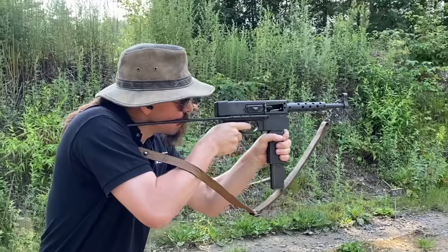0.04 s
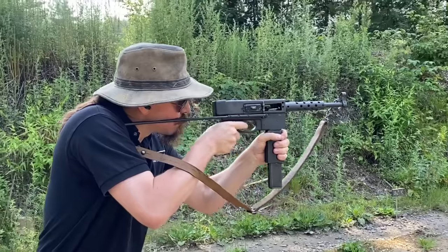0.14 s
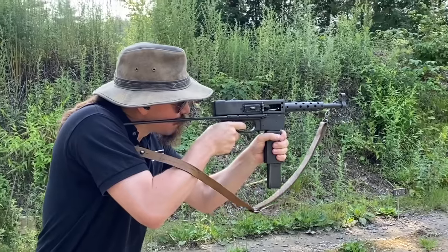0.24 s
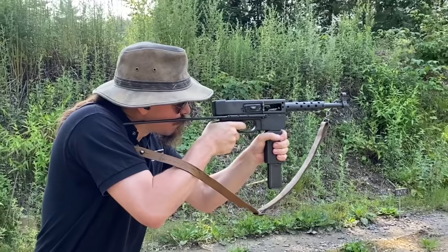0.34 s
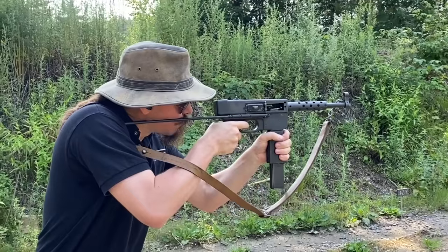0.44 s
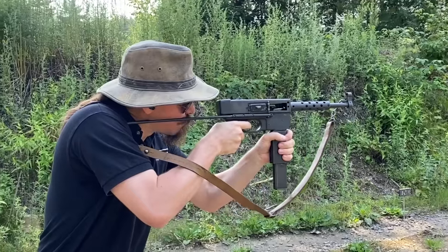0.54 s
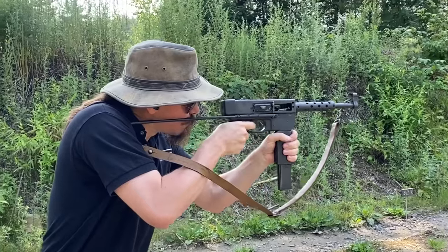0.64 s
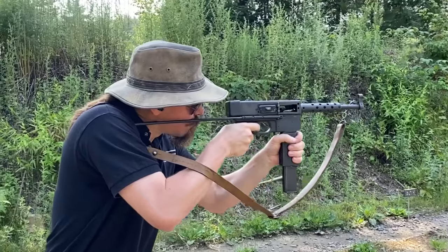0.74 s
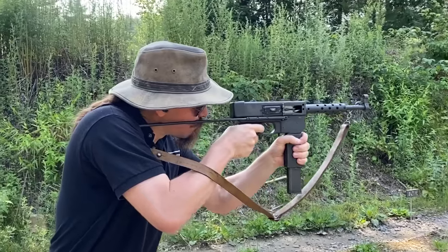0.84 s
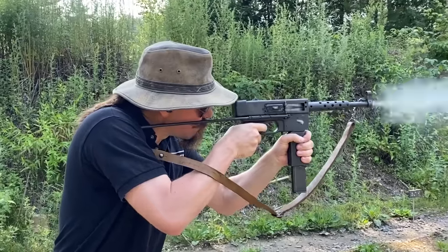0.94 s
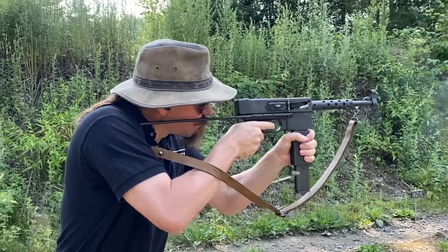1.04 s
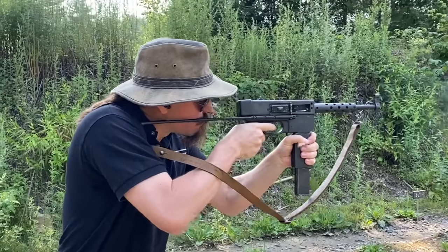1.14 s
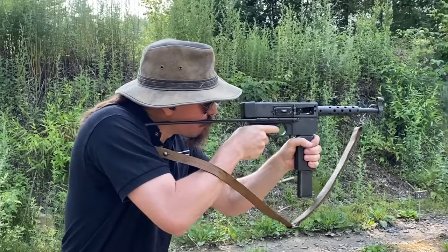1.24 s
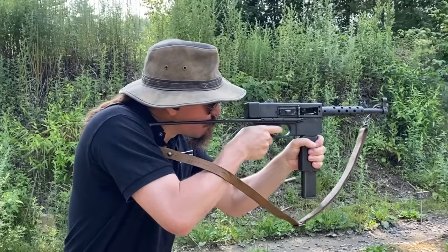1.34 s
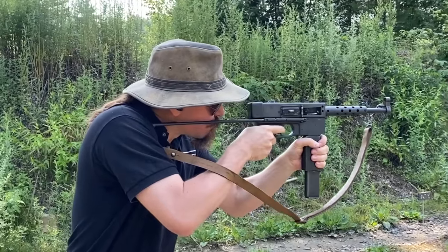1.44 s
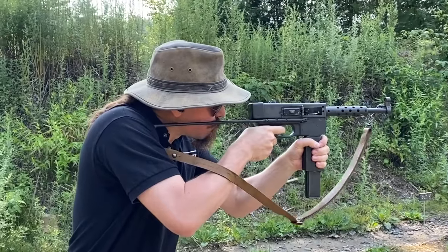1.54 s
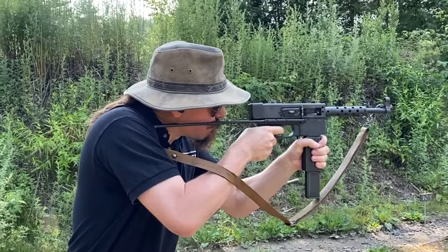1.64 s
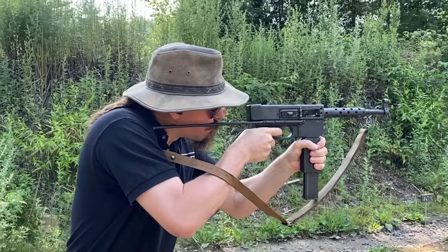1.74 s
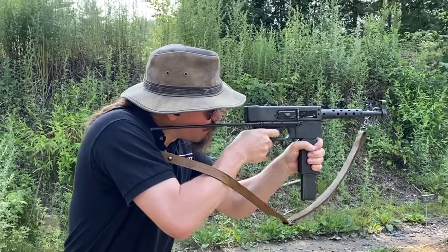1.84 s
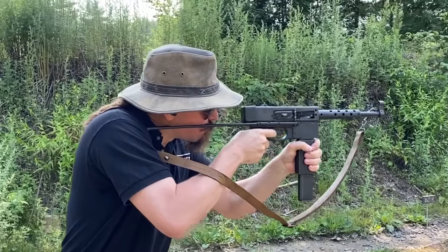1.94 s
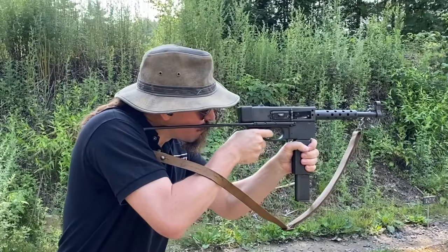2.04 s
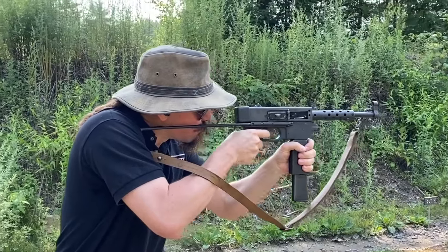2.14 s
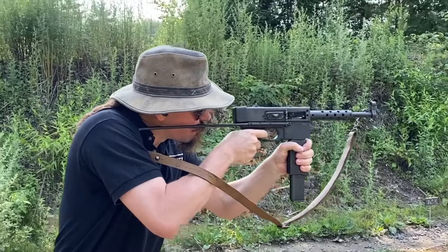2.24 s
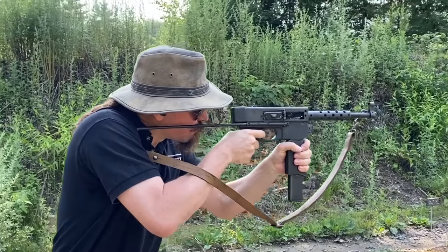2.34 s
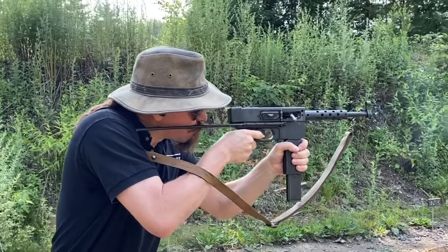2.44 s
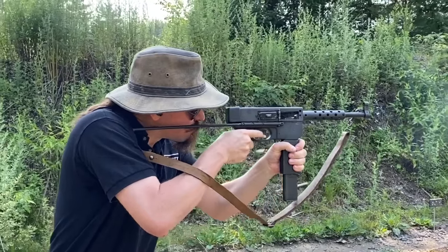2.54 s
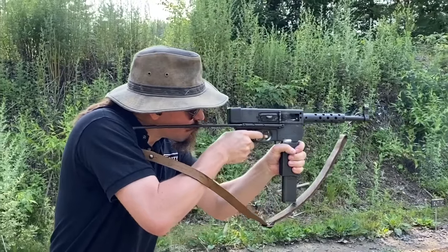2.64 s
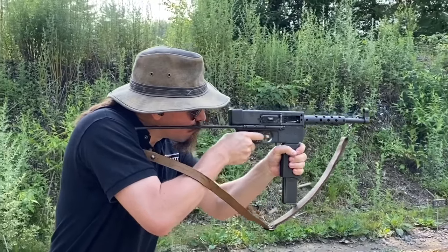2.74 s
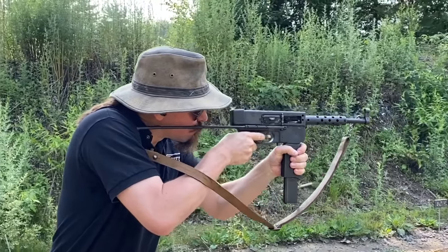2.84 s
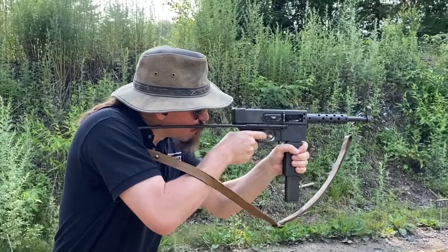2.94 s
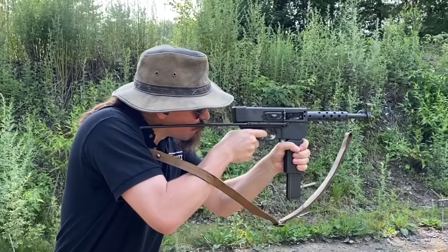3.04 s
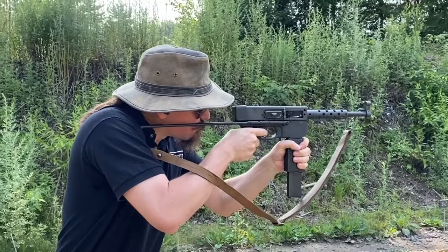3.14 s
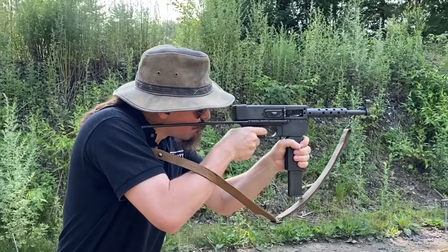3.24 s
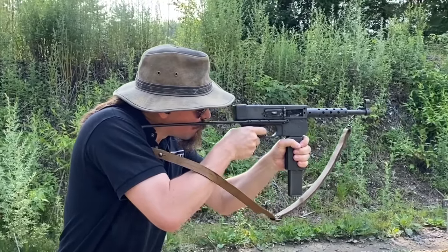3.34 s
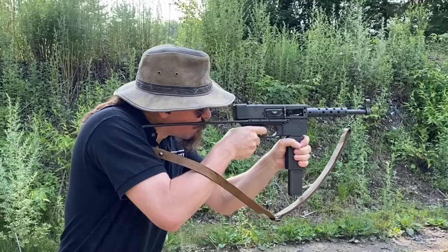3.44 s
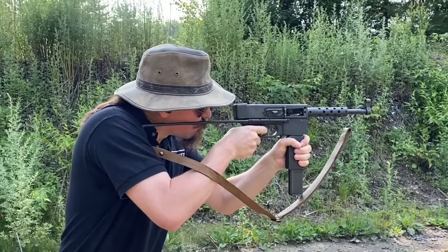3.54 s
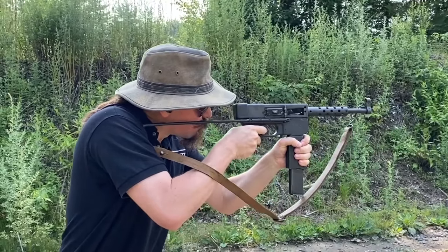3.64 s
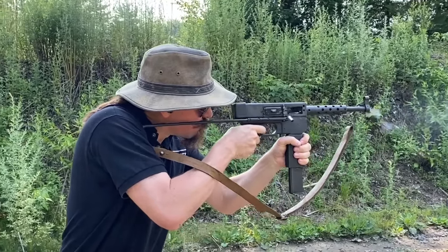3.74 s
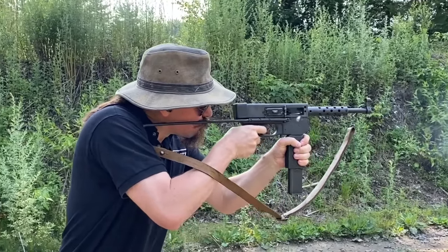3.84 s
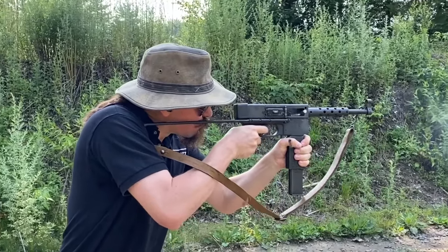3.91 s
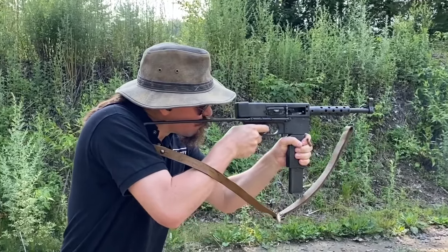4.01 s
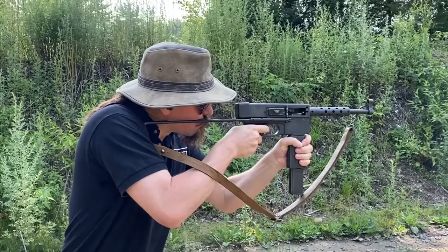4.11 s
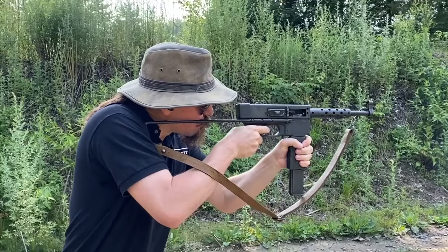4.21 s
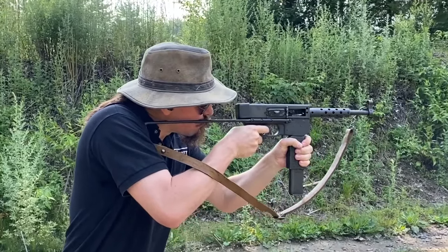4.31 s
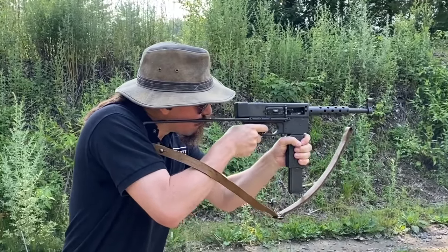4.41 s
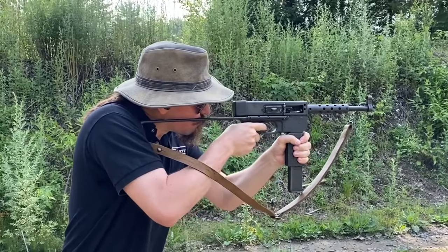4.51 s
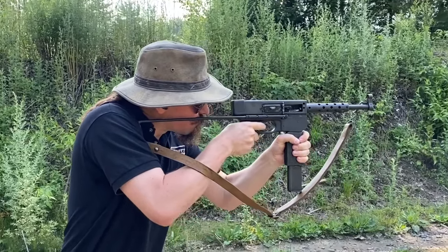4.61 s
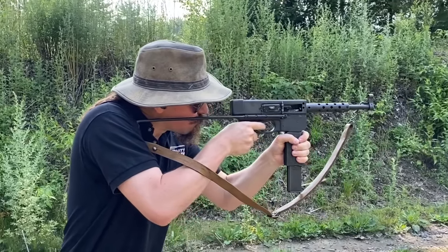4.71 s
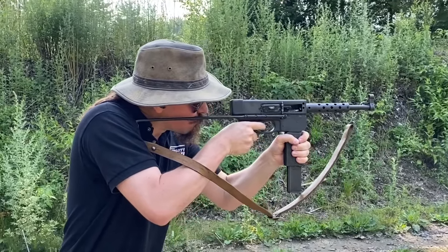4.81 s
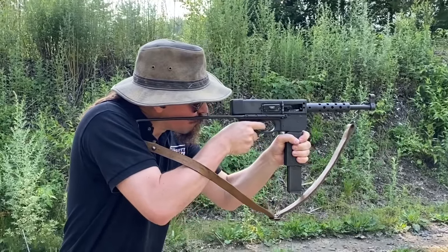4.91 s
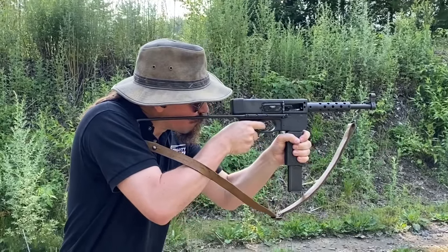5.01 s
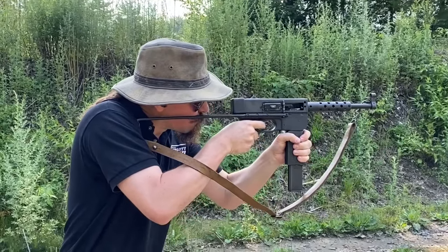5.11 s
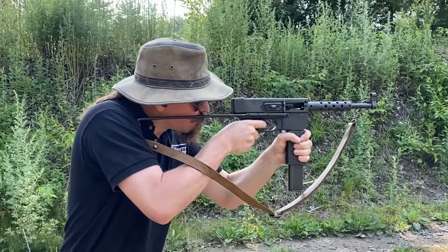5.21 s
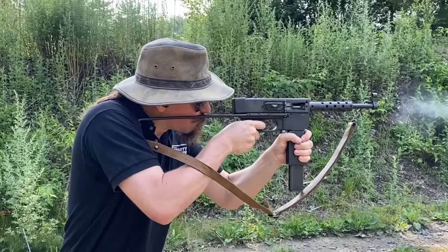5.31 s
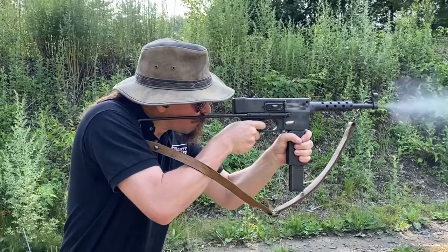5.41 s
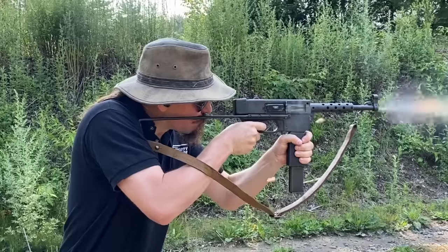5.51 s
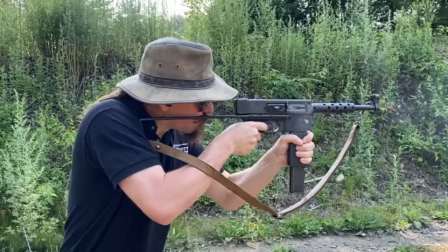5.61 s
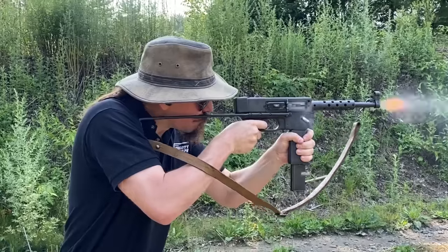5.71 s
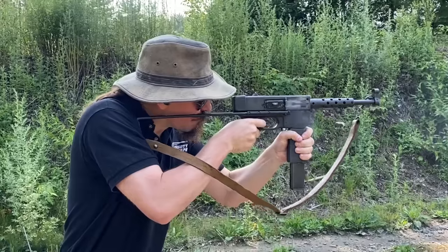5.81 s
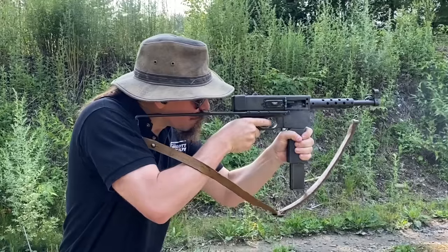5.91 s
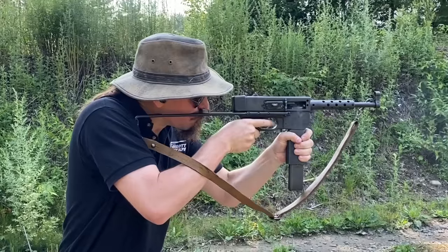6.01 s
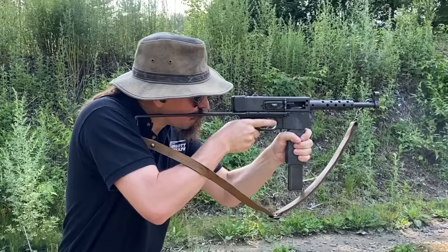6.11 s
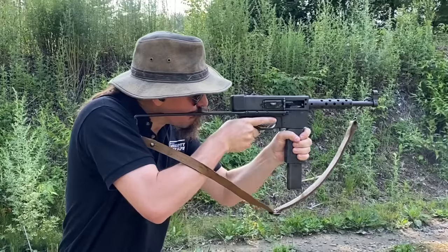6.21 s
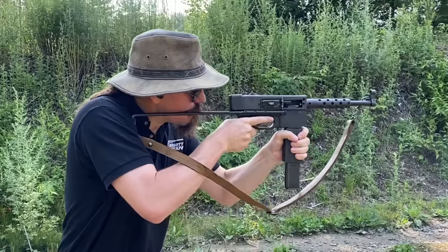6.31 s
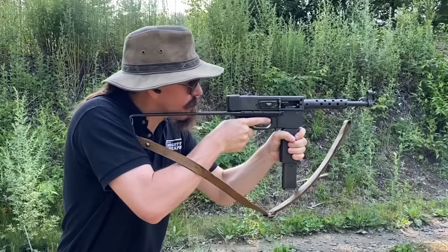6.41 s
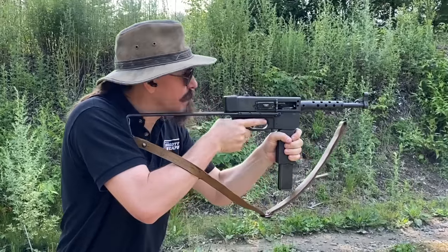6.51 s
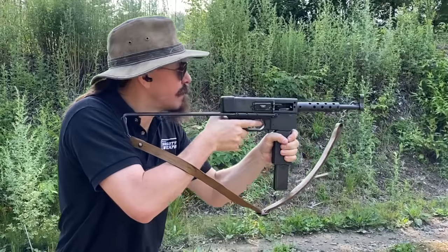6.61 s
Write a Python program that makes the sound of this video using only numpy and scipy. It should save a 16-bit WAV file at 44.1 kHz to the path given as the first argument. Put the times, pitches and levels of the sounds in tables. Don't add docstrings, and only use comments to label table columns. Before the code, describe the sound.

Dry steel clicks and sling rustle give way to a loud pair of shots, another pair, three shots, then a longer run of six. Each blast is a ragged crack with a low thump and clattering action. Dull claps and hissing echoes return across the open range, fading into quiet hush with faint chirps and tiny brass rings. Two close microphone ports catch slight wind.

```python
import sys
import numpy as np
from scipy import signal
from scipy.fft import rfft, irfft, next_fast_len
from scipy.io import wavfile
from scipy.ndimage import uniform_filter1d

SR = 44100
rng = np.random.default_rng(int(sys.argv[2]) if len(sys.argv) > 2 else 0)


def log_audio(samples):
    frames = np.atleast_2d(samples).T
    limited = np.clip(frames, -1, 1)
    pcm = np.round(limited * 32767).astype(np.int16)
    wavfile.write(sys.argv[1], SR, pcm)


def gain_from_db(level_db):
    decades = np.asarray(level_db, float) / 20
    return 10 ** decades


N = 293706


def evened(x):
    return x / np.sqrt(np.mean(x ** 2) + 1e-20)


def read(points, hz):
    f, value = np.transpose(points)
    return np.interp(np.log(hz + 1), np.log(f + 1), value)


def follow(points, t):
    return np.interp(t, *np.transpose(points))


def ragged(size, smooth, spread_db):
    return gain_from_db(spread_db * evened(uniform_filter1d(rng.standard_normal(size), smooth)))


def add(mix, s, sound):
    part = mix[:, round(s * SR):][:, :sound.shape[-1]]
    part += sound[..., :part.shape[1]]


def hiss(size, colour, apart):
    hz = np.fft.rfftfreq(size, 1 / SR)
    both, own = rfft(rng.standard_normal(size)), rfft(rng.standard_normal((2, size)))
    spectrum = both + apart * own * (hz < 8000)
    return evened(irfft(spectrum * gain_from_db(read(colour, hz)), size))


def field_grid():
    return np.arange(N // 128 + 5) * 128 / SR, np.fft.rfftfreq(512, 1 / SR)[:, None]


# (frequency [Hz], left-right likeness [-1..1])
PORT_LIKENESS = [(100, 0.86), (300, 0.93), (500, -0.63), (1500, -0.41), (2100, 0.85), (2600, 0.34),
                 (7000, 0.22), (8300, 0.6)]


def field(level_db):
    a, b, c, d, patches = rng.standard_normal((level_db.shape[1], 257, 5)).T
    patches = evened(uniform_filter1d(uniform_filter1d(patches, 5, 0), 12, 1))
    same = np.clip(read(PORT_LIKENESS, field_grid()[1][:, 0]), -1, 1)[:, None]
    left = a + 1j * b
    right = same * left + np.sqrt(1 - same ** 2) * (c + 1j * d)
    z = np.array([left, right])
    z[:, :2] = 0
    return signal.istft(z * gain_from_db(level_db + 1.5 * patches), nperseg=512, noverlap=384)[1][:, :N]


# (frequency [Hz], level [dB per Hz])
FLOOR_COLOUR = [(18, -40.5), (30, -6), (71, 10), (165, -13), (355, -1), (822, -3), (1110, -17), (2000, -5),
                (5790, -42.5), (8000, -58), (9500, -82), (22000, -120)]


def floor():
    t, hz = field_grid()
    return gain_from_db(-59) * evened(field(read(FLOOR_COLOUR, hz) + 0 * t))


# (frequency [Hz], level [dB per Hz])
WIND_TONE = [(20, -28.5), (45, -8), (75, 4), (120, -9), (200, -19), (400, -43), (1000, -95.5)]


def breeze():
    return gain_from_db(-62.5) * hiss(N, WIND_TONE, .3)


# (time [s], level [dB])
GUSTS = [(0.0, -41.5), (0.07, -39), (0.136, -39.5), (0.206, -48), (0.228, -40), (0.422, -38), (0.432, -40),
         (0.82, -44)]


def wind(t):
    return gain_from_db(follow(GUSTS, t)) * hiss(len(t), WIND_TONE, 0.26)


# (frequency [Hz], level [dB per Hz])
LEAF_COLOUR = [(1500, -13), (3000, 1.5), (7000, -5), (14500, -12.5), (16300, -44.5)]


def leaves(t):
    return gain_from_db(-65.5) * hiss(len(t), LEAF_COLOUR, .8)


# (time [s], frequency [Hz])
INSECT_PITCH = [(0, 3900), (.2, 4250), (.35, 4400), (.75, 4600)]


def insect(t):
    level_db, fade_db_per_s = -65.5, -13.5
    phase = 2 * np.pi * np.cumsum(follow(INSECT_PITCH, t)) / SR
    return gain_from_db(level_db + fade_db_per_s * t) * ragged(len(t), 900, 3) * np.sin(phase)


# (time [s], level [dB])
RUSTLE_LEVEL = [(0.0, -56), (0.208, -61), (0.408, -46), (0.454, -49.5), (0.57, -63), (0.618, -72.5),
                (0.81, -64.5)]
# (frequency [Hz], level [dB per Hz])
CLOTH_COLOUR = [(200, -8), (600, -4), (2000, -7.5), (4000, -13.5), (8000, -17.5), (15300, -29.5),
                (16400, -52.5)]


def rustle(t):
    ticks_per_s, ticks_db, tick_decay_s = 330, 0.5, 0.00095
    ticks = (rng.random(len(t)) < ticks_per_s / SR) * rng.exponential(1, len(t))
    grains = signal.oaconvolve(ticks, np.exp(-t[:600] / tick_decay_s))[:len(t)]
    level = gain_from_db(follow(RUSTLE_LEVEL, t) - 1.0)
    return (1 + gain_from_db(ticks_db) * grains) * level * hiss(len(t), CLOTH_COLOUR, 0.56)


def before():
    t = np.arange(0, BOLT_RUNS[0][1], 1 / SR)
    ducked = np.minimum((t[-1] - t) / .04, 1)
    return (wind(t) + rustle(t) + leaves(t) + insect(t)) * ducked


# (time [s], level [dB])
BIRD_CALLS = [
    (2.022, -68),
    (2.107, -69),
    (2.194, -66),
    (2.279, -69),
    (3.4, -64.5),
    (3.487, -62.5),
    (3.577, -64),
]


def bird(db):
    t = np.arange(3300) / SR
    chirp_s = .022
    hz = 5900 + 2200 * np.exp(-t / 0.0063)
    arch = (t < chirp_s) * abs(np.sin(np.pi * t / chirp_s)) ** .5
    fall = np.sin(2 * np.pi * np.cumsum(hz) / SR) * arch
    buzz = hiss(len(t), [(4000, -33.0), (4500, -9.5), (5250, -4), (5600, -2), (6100, -35.5)], 0.55)
    return gain_from_db(db - 3.5) * fall + gain_from_db(db - 2.0) * buzz * np.exp(-((t - .055) / 0.011) ** 2)


def since_blast(t):
    fired = np.array([-9] + [row[0] for row in BLASTS])
    return t - fired[np.searchsorted(fired, t, "right") - 1]


# (frequency [Hz], level [dB per Hz])
RUMBLE_COLOUR = [(20, -27.5), (40, -2), (60, -1.5), (110, -5.5), (200, -8.5), (300, -34.5), (1000, -91)]
# (delay [s], spread [s], level [dB])
LATE_RETURN = (.3, 0.051, 9.7)


def rumble():
    delay = since_blast(np.arange(N) / SR)
    late_s, spread_s, late_db = LATE_RETURN
    level_db = -40.5 - 40.5 * delay
    level_db += late_db * np.exp(-((delay - late_s) / spread_s) ** 2)
    return uniform_filter1d(gain_from_db(level_db), size=400) * hiss(N, RUMBLE_COLOUR, .6)


# (delay [s], level [dB])
ECHO_LEVEL = [(0, -42), (.08, -38), (.17, -33), (.3, -34), (.42, -36.5), (.6, -45), (.85, -54.5),
              (1.1, -61), (1.45, -68.5)]
BURST_TRIM = [-0.11, -0.49, 0.83, -1.32]
# (frequency [Hz], level [dB])
ECHO_COLOUR = [(170, -26.5), (300, -1), (500, 9), (1200, 4), (2300, 3), (7000, -2.5), (15300, -3.5),
               (16400, -48.5)]
# (frequency [Hz], slope [dB per s of travel])
AIR_LOSS = [(300, 4.5), (1000, 8), (2700, -3.4), (6300, -12.5), (10000, -30.5), (15000, -52)]
# (delay [s], spread [s], frequency [Hz], width [octaves], level [dB])
BANK_RETURNS = [
    (.21, 0.013, 2500, 0.52, 8),
    (.33, 0.035, 487, 0.28, 6.5),
    (.42, .015, 700, 1.1, 5),
]


def roll():
    t, hz = field_grid()
    delay = since_blast(t)
    burst = np.searchsorted([row[0] for row in BOLT_RUNS[1:]], t)
    level = np.interp(delay, *np.transpose(ECHO_LEVEL), right=-150) + np.take(BURST_TRIM, burst)
    level = level + read(ECHO_COLOUR, hz) + read(AIR_LOSS, hz) * np.minimum(delay, 2)
    for s, spread, bank_hz, octaves, db in BANK_RETURNS:
        in_time = ((delay - s) / spread) ** 2
        in_pitch = (np.log2((hz + 1) / bank_hz) / octaves) ** 2
        level = level + db * np.exp(-in_time - in_pitch)
    return field(level - 14.5)


# (time [s], peak [dB], frequency [Hz])
FAR_SLAPS = [
    (1.141, -24, 362),
    (1.281, -21, 450),
    (1.364, -19, 582),
    (2.919, -23.5, 580),
    (4.301, -21.5, 590),
    (6.144, -24, 457),
    (6.249, -25.5, 566),
]


def slap(db, hz):
    t = np.arange(900) / SR
    swell = t / 0.002 * np.exp(1 - t / 0.0033)
    return gain_from_db(db) * np.sin(2 * np.pi * hz * t) * swell * np.array([[1], [-.3]])


# (time [s], tick peak [dB], ring [dB])
CASE_LANDINGS = [
    (1.5743, -28, -65),
    (3.1004, -40, -76),
    (4.447, -29, -59.5),
    (6.3857, -34.5, -67),
]


def case(tick_db, ring_db):
    t = np.arange(15000) / SR
    thin = [(2000, -12), (5000, -4.5), (11000, -3), (14000, 1.5), (15600, -3), (16400, -35.5)]
    tick = hiss(len(t), thin, 0.25) * gain_from_db(tick_db - 5 - 60 * t / 0.013)
    beat = 1 + 0.5 * np.sin(2 * np.pi * 23 * t)
    return tick + gain_from_db(ring_db - 60 * t / 0.93) * np.sin(2 * np.pi * 10950 * t) * beat


# (time [s], peak [dB], ring [Hz])
GUN_CLICKS = [(.813, -28, 2010), (.0692, -53, 2220), (.0798, -32, 2250), (.1895, -32.5, 2320),
              (.201, -28, 2430), (.263, -33.5, 2190), (.2966, -15.5, 2480), (.3511, -30.5, 2180),
              (.3567, -24.5, 2254), (.383, -17, 2450), (.443, -18.5, 2254), (.4747, -17, 2590),
              (.5334, -29.5, 2160), (.5661, -20, 2372), (2.443, -20.5, 1980), (3.7155, -13, 4340)]
# (frequency [Hz], level [dB], t60 [s])
LOOSE_STEEL = [(950, -8, .04), (1250, -10, .04), (1750, -9, .045), (2300, 0, .035), (2520, -3, .04),
               (4100, -6, .025)]


def click(db, hz):
    t = np.arange(6000) / SR
    snap = hiss(len(t), [(300, -30), (hz * 0.5, -9), (hz, 0), (hz * 1.5, -6), (9000, -12),
                         (15500, -22), (16400, -50)], 0.1)
    snap = snap * gain_from_db(-60 * t / 0.053) / (1 + (t / 0.011) ** 6)
    tail = hiss(len(t), [(300, -29), (900, -0.5), (2200, 2.5), (4000, -10.0), (9000, -29.0)], 0.77)
    rings = 0
    for f, ring_db, t60 in LOOSE_STEEL:
        level = gain_from_db(ring_db + 4 * rng.standard_normal() - 60 * t / t60)
        rings = rings + level * np.sin(2 * np.pi * f * rng.uniform(0.9, 1.03) * t)
    return gain_from_db(db - 9.5) * (snap + gain_from_db(-4.5) * rings + gain_from_db(-12.5 - 60 * t / .22) * tail)


# (start [s], slam [s], start level [dB], slam level [dB], hollow knock [dB])
BOLT_RUNS = [
    (0.82, 0.869, -14, -16, -7),
    (2.376, 2.413, -30, -27, -12.5),
    (3.648, 3.689, -34.5, -24, -15.5),
    (5.276, 5.309, -36.5, -18.5, -19.5),
]
# (frequency [Hz], level [dB per Hz])
SCRAPE_COLOUR = [(180, -60.5), (300, -29), (1090, -25.5), (1480, -4), (1650, -13), (2520, -6),
                 (3760, -14.5), (4310, -13), (8000, -14.5), (10400, -13.5), (17600, -120)]


def bolt(start, slam, start_db, slam_db, knock_db):
    t = np.arange(start - slam, .004, 1 / SR)
    chatter = ragged(len(t), 60, 3.3)
    scrape = hiss(len(t), SCRAPE_COLOUR + [(15000, -14), (16400, -58)], 0.79) * chatter
    knock = hiss(len(t), [(400, -21.5), (750, -7), (950, 4.5), (1250, -16), (2200, -16.0)], 1.0)
    level_db = np.interp(t, [t[0], 0], [start_db, slam_db])
    swell = gain_from_db(knock_db) * np.exp(np.minimum(t, 0) / 0.0068)
    thud_hz, thud_s, lead_s = 276, 0.0042, 0.0056
    thud = np.sin(2 * np.pi * thud_hz * t) * np.exp(-((t + lead_s) / thud_s) ** 2)
    sound = gain_from_db(level_db) * scrape + swell * knock + gain_from_db(knock_db + 0.5) * thud
    return sound * signal.windows.tukey(len(t), .08)


def sweep(top_hz, tau, ring):
    t = np.arange(5000) / SR
    ports_apart = .015 * np.array([[1], [-1]])
    slide_s = tau * (rng.uniform(0.914, 1.062) + ports_apart)
    ground_hz = 40.7 + 44.4 * np.exp(-t / 0.027)
    hz = ground_hz + top_hz * np.exp(-t / slide_s)
    fade = 0.8 * np.exp(-(t / ring) ** 1.9) + 0.22 * np.exp(-t / .04)
    return hz, np.sin(2 * np.pi * np.cumsum(hz, 1) / SR) * fade * np.minimum(t / 0.0025, 1)


# (frequency [Hz], level [dB per Hz])
ACTION_COLOUR = [(700, -26.5), (1500, -7.5), (2600, 0), (4200, -8.5), (9000, -8), (16300, -23)]
# (delay [s], level [dB re crack])
ACTION_CYCLE = [
    (.022, -20.5),
    (.036, -20.5),
    (.075, -26.5),
]


def action(t):
    jitter = .003 * rng.standard_normal((len(ACTION_CYCLE), 2))
    knocks = 0
    for s, db in np.add(ACTION_CYCLE, jitter):
        level = gain_from_db(db + 2.3 * rng.standard_normal())
        knocks = knocks + level * np.exp(-abs(t - s) / np.where(t > s, .011, .002))
    return hiss(len(t), ACTION_COLOUR, 1.0) * knocks


# (time [s], crack peak [dB], thump [dB], ground slap delay [s], slap [dB])
BLASTS = [(.865, -15, -11, .044, -20), (0.952, -11.5, -8, 0.036, -30), (2.409, -6, -11.5, .035, -6.5),
          (2.499, -5.5, -3.5, .04, -27.5), (3.685, -6, -16, .03, -9), (3.773, -5.5, -7.5, .039, -9.5),
          (3.881, -5.5, -6.5, .036, -21), (5.312, -5.5, -5, .033, -10.5), (5.42, -6, -2.5, .047, -25),
          (5.524, -6.5, -12.5, .039, -9.5), (5.625, -7, -4, .04, -43), (5.724, -8.5, -12.5, .036, -7),
          (5.829, -5.5, -10.5, 0.032, -12.5)]
# (frequency [Hz], level [dB per Hz])
CRACK_COLOUR = [(300, 0.5), (700, -9.5), (1500, -5.5), (3000, -9), (6000, -14), (10000, -9), (15500, -18),
                (16500, -45)]
# (frequency [Hz], level [dB per Hz])
GAS_COLOUR = [(120, -28), (280, 2), (500, 0.5), (900, -8.5), (1600, -12), (3000, -40)]


def shot(crack_db, thump_db, delay, slap_db):
    t = np.arange(9000) / SR
    gate = np.minimum(t / 0.00016, 1) / (1 + (t / 0.011) ** 6)
    spits = gate * ragged(len(t), 30, 4.9) * np.exp(-t / 0.024)
    scatter = gain_from_db(-6.5) * np.exp(-t / 0.044)
    sound = gain_from_db(crack_db - 8.5) * hiss(len(t), CRACK_COLOUR, 1.0) * (spits + scatter)
    puff = np.minimum(t / 0.011, 1) / (1 + (t / 0.012) ** 5)
    sound += gain_from_db(crack_db - 4.5) * hiss(len(t), GAS_COLOUR, 0.88) * puff
    sound += gain_from_db(crack_db) * action(t)
    hz, wave = sweep(1000, 0.00528, 0.023)
    bass = 1 / (1 + (hz / 190) ** 3)
    add(sound, 0, wave * (gain_from_db(thump_db + 4.5) * bass + gain_from_db(crack_db - 5.5) * (1 - bass)))
    add(sound, delay, gain_from_db(slap_db - 2.5) * sweep(80, 0.006, 0.037)[1])
    return sound


def scene():
    mix = floor() + breeze() + rumble() + roll()
    add(mix, 0, before())
    sources = [(BIRD_CALLS, bird), (FAR_SLAPS, slap), (CASE_LANDINGS, case), (GUN_CLICKS, click), (BLASTS, shot)]
    for table, source in sources:
        for s, *row in table:
            add(mix, s, source(*row))
    for row in BOLT_RUNS:
        add(mix, row[0], bolt(*row))
    return mix


def band_limit(x):
    return signal.sosfilt(signal.butter(12, 16510, fs=SR, output="sos"), x)


# (frequency [Hz], phase [rad])
PORT_LAG = [(0, 0), (3000, .3), (6000, 0), (8600, -3.14), (10300, -6.28), (12050, -9.42), (14000, -12.57),
            (15900, -15.7), (22050, -25.8)]


def record(dry):
    size = next_fast_len(N + 4096)
    hz = np.fft.rfftfreq(size, 1 / SR)
    lag = follow(PORT_LAG, hz)
    saturated = .92 * np.tanh(dry / .9)
    ports = np.exp([1j * lag, 0 * lag]) / (1 + (hz / 16350) ** 90)
    pair = irfft(rfft(saturated, size) * ports, size)[:, :N]
    return band_limit(pair)


dry = scene()
out = record(dry)
log_audio(out)
```